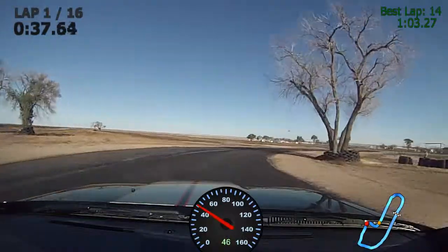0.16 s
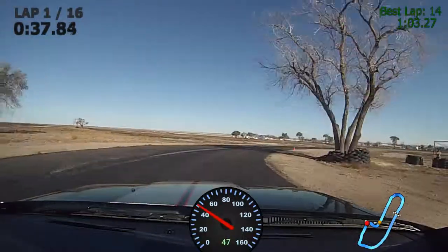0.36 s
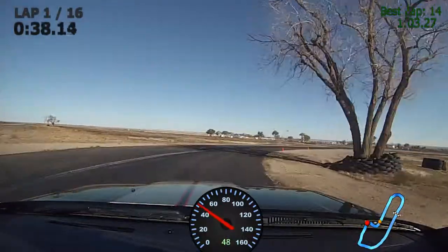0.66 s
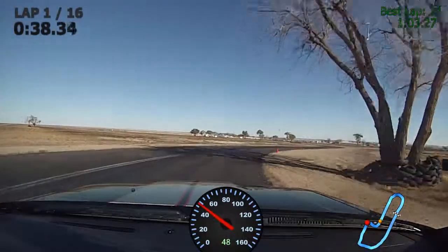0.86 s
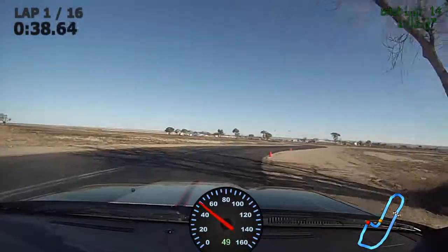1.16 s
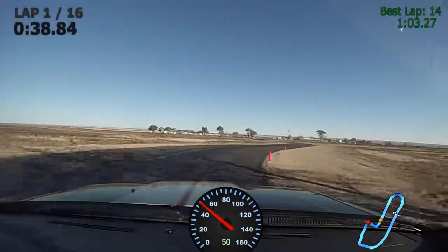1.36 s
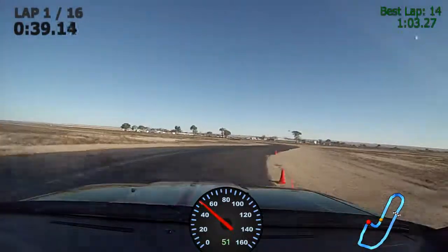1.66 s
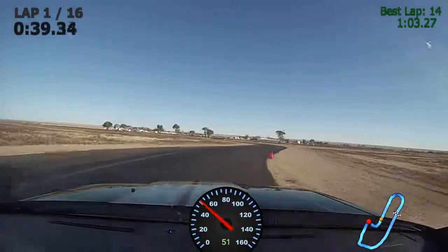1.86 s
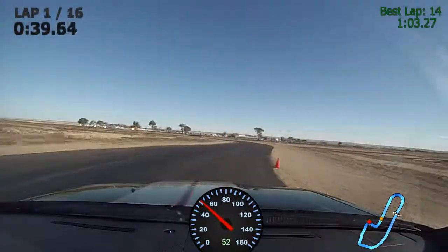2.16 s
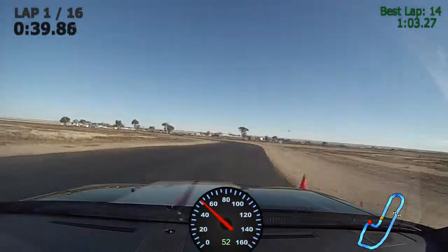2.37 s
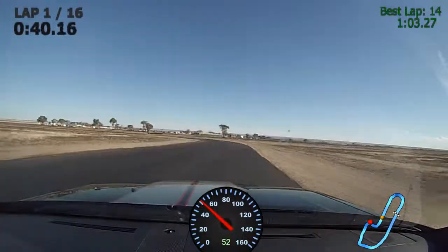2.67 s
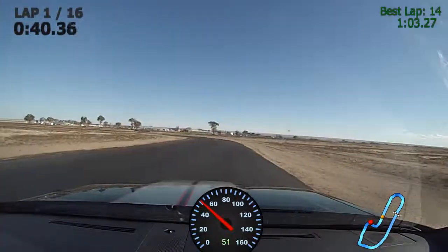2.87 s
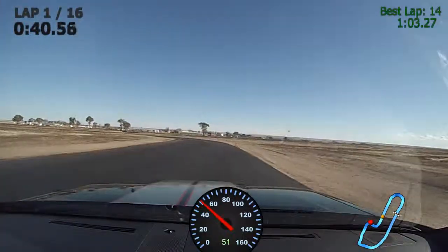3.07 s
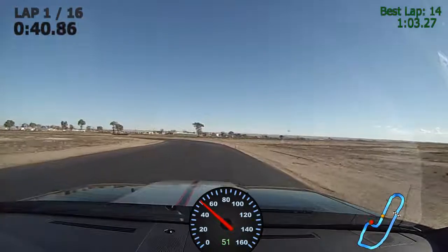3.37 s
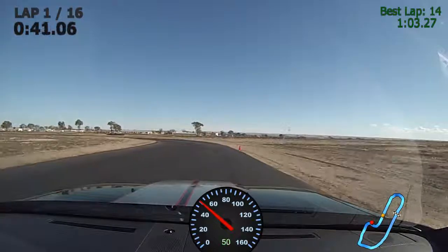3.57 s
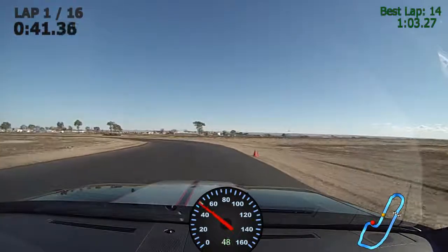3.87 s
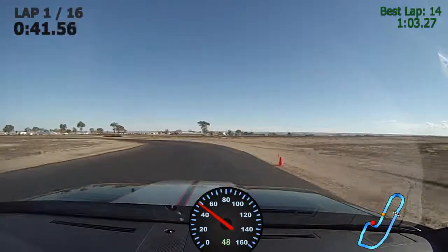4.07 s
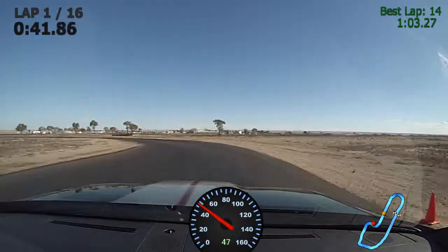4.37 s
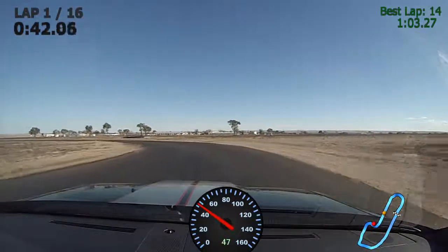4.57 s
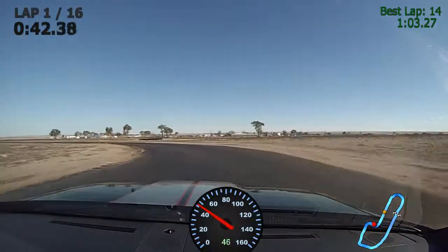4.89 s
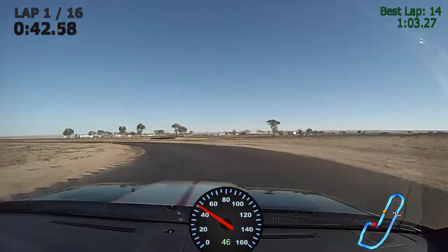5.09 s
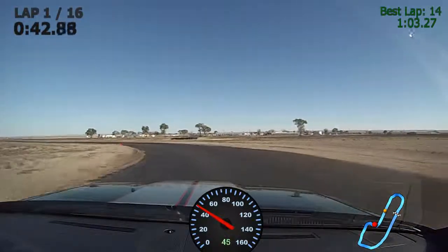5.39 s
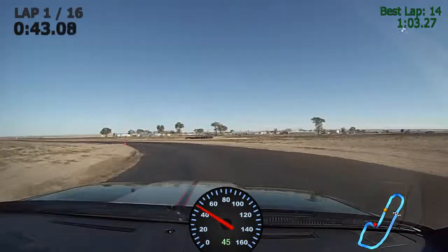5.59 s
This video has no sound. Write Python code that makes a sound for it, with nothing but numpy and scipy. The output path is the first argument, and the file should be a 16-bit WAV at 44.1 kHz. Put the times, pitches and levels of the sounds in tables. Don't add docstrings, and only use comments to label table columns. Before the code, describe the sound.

Close, boomy mono cabin sound, slightly crude and gritty. An eight-cylinder engine pulls in one gear, its pitch creeping upward, over broad road noise. A joint bangs the floor and the level briefly dips; tyres chirp and scrape through the bend. Then the driver lifts, the engine all but vanishes, and wind buffets and hollow floor drumming dominate until a stone clacks on the sill and another joint thuds.

```python
import sys
import numpy as np
from scipy import signal
from scipy.fft import rfft, irfft, next_fast_len
from scipy.io import wavfile
from scipy.ndimage import uniform_filter1d, map_coordinates

SR = 44100
rng = np.random.default_rng(int(sys.argv[2]) if len(sys.argv) > 2 else 0)


def unload_audio(sound):
    columns = np.transpose(np.atleast_2d(sound))
    steps = np.round(np.clip(columns, -1, 1) * 32767)
    wavfile.write(sys.argv[1], SR, steps.astype(np.int16))


def how_loud(loudness_db):
    steps = np.asarray(loudness_db, float) / 20
    return 10 ** steps


N = 253134


def engine():
    # t/s, shaft/(turns/s), load/dB
    drive = [(0, 49.9, 0), (.39, 51.6, 0), (.96, 53.1, 0), (1.3, 54.3, 0), (1.75, 56, -1), (2.33, 57.5, 0),
             (2.6, 58.2, 0), (2.9, 58.6, -2), (3.15, 58.45, -7), (3.35, 58.1, -18), (3.6, 57.4, -26),
             (5.74, 51, -29)]
    orders = [2, 3, 4, 5, 6, 6.5, 7, 7.5, 8, 8.5, 9, 9.5, 10, 10.5, 11, 12, 14]
    # low revs/dB, high revs/dB
    orders_db = [(-35, -30), (-24.5, -22.5), (-21, -25), (-41, -48), (-43, -30), (-46, -38), (-41, -40),
                 (-48, -46), (-45, -50), (-50, -44), (-43, -41), (-45, -40), (-43, -39), (-45, -42),
                 (-44, -46), (-44, -43), (-44, -42)]
    # f/Hz, half width/Hz, lift/dB
    cabin = [(428, 10, 12), (507, 12, 11)]
    breath_db, breath_rate_hz = 0.8, 8

    shaft_hz, load_db = curves(drive)
    angle = 2 * np.pi * np.cumsum(shaft_hz) / SR
    revs = (shaft_hz - 50) / 8.5
    drift = 0.018 * wobble(12)
    tone = np.zeros(N)
    for k, (low_db, high_db) in zip(orders, orders_db):
        level_db = low_db + (high_db - low_db) * revs ** 2 + load_db + 2.5
        for centre_hz, width_hz, lift_db in cabin:
            level_db = level_db + lift_db / (1 + ((k * shaft_hz - centre_hz) / width_hz) ** 2)
        level_db = level_db + breath_db * wobble(breath_rate_hz)
        tone += how_loud(level_db) * np.sin(k * (angle + drift) + rng.uniform(0, 2 * np.pi))
    return tone, angle, revs


def road(angle, revs):
    # t/s, level/dB
    load = [(0, -22), (.26, -23.5), (1.25, -20.5), (1.9, -23.5), (2.36, -21), (3.1, -24), (3.65, -24.5),
            (4.9, -22.5), (5.3, -23.5), (5.74, -25.5)]
    # centre t/s, peak/dB, length/s
    jolts = [(.03, -21, .08), (.13, -19.5, 0.19), (.4, -22, 0.74), (.915, -18, 0.18), (1.45, -19.5, 0.077),
             (1.87, -26.5, 1), (2.55, -22, 0.088), (3.07, -26.5, .08), (3.41, -27.5, 0.17),
             (3.62, -28, 0.15), (3.88, -23, 0.16), (4.47, -24, 0.6), (4.9, -21.5, 0.57),
             (5.23, -25.5, 0.22), (5.616, -18.5, 0.06)]
    # centre t/s, length/s
    lulls = [(1.414, 0.021), (1.55, 0.11), (2.365, 0.077), (3.55, 0.036), (3.68, 0.035), (5.182, 0.036),
             (5.73, 0.084)]
    # f/Hz, level/(dB per Hz)
    boom_colour = [(29, 8.5), (50, -5), (65, -8), (124, -4), (167, -10), (183, -13.5), (200, -6),
                   (232, -21), (280, -18), (360, -46), (620, -120)]
    # f/Hz, level/(dB per Hz)
    roar_colour = [(140, -20), (240, -0.5), (290, -7), (322, 3), (349, -3.5), (442, -2.5), (479, -4.5),
                   (552, 0.5), (690, -3), (796, -0.5), (903, -8), (1030, -8), (1160, -19.5), (1420, -25.5),
                   (1600, -31), (2080, -61), (3520, -120)]
    # f/Hz, level/(dB per Hz)
    hiss_colour = [(900, -38), (1300, 0.5), (1700, -1), (1920, 0.5), (2050, 2.5), (2400, 1), (2800, 0),
                   (2925, 2), (3050, -3), (3600, -7.5), (5000, -12.5), (7500, -18.5), (9500, -24.5),
                   (16000, -34.5)]
    shake_db = -3

    roar_db, = curves(load)
    hiss_db = -49 + 3.5 * np.abs(revs) ** 1.8 + 0.14 * (roar_db - roar_db.mean())
    uneven = wobble(8)
    throb = 1 + 0.044 * np.cos(angle) + 0.13 * np.cos(2 * angle)
    rest = 1 - np.clip(swells([(s, 0, length) for s, length in lulls]), 0, 1)
    shaken = np.hypot(swells(jolts), how_loud(roar_db + shake_db)) * rest

    boom_gain = shaken * how_loud(2.5 + 0.82 * wobble(25)) + how_loud(roar_db - 12.5)
    boom = boom_gain * evened(rush(boom_colour, patchy_db=-0.4), size=3000, share=0.93)
    roar_gain = how_loud(roar_db - 3.5 + 0.31 * uneven + 0.56 * wobble(40)) * throb
    roar = roar_gain * rush(roar_colour, patchy_db=0.1)
    hiss_gain = how_loud(hiss_db + 0.12 * uneven + 1.07 * wobble(60))
    hiss = hiss_gain * rush(hiss_colour, patchy_db=-0.25)
    return boom + roar + hiss


def tyres():
    # t/s, f/Hz, length/s, peak/dB
    slips = [(.005, 1030, .035, -20), (.6, 800, .05, -24), (1.495, 800, .035, -20), (1.535, 1850, .03, -41),
             (1.58, 726, .075, -20), (1.7, 720, .05, -25), (1.745, 725, .075, -19), (1.845, 715, .025, -22),
             (1.865, 720, .04, -19), (1.9, 725, .045, -16), (1.94, 725, .045, -18), (1.985, 725, .04, -15),
             (2.04, 735, .035, -19), (2.08, 735, .028, -16), (2.14, 790, .03, -19), (2.175, 800, .03, -20),
             (2.21, 800, .045, -22), (2.305, 722, .05, -15), (2.372, 833, .07, -15), (2.44, 800, .05, -23),
             (2.497, 830, .026, -14), (2.525, 845, .03, -21), (2.635, 800, .028, -24),
             (2.74, 780, .06, -25), (5.03, 780, .045, -24), (5.085, 780, .04, -24), (5.335, 782, .1, -20),
             (5.47, 790, .09, -25)]
    # t/s, f/Hz, peak/dB
    plucks = [(.059, 700, -18), (1.21, 740, -16), (3.471, 820, -15), (3.922, 620, -19), (3.99, 700, -22),
              (4.09, 700, -21), (4.146, 700, -23)]
    # t/s, f/Hz, length/s, peak/dB
    drums = [(3.3, 119, 0.1, -16.5), (3.56, 117.7, 0.21, -22), (4.21, 159.7, 0.4, -15.5),
             (4.25, 81.2, 0.23, -20.5), (4.39, 117, 0.15, -18), (4.61, 121.4, 0.17, -16),
             (4.84, 117.6, .16, -18.5), (4.88, 193, 0.069, -16), (5.06, 206.7, 0.13, -20.5),
             (5.18, 117.1, 0.4, -20.5)]
    # centre t/s, peak/dB, length/s
    scrubs = [
        (2.25, -50, 0.18),
        (2.43, -41.5, 0.17),
        (2.56, -44.5, 0.16),
        (2.67, -51.5, 0.19),
    ]
    # f/Hz, level/(dB per Hz)
    scrub_colour = [(1400, -34), (1650, -1), (1900, 2.5), (2200, -6), (2600, -10.5), (2950, -8),
                    (3300, -14), (4500, -40)]
    pluck_s = 0.011

    scrub = swells(scrubs) * how_loud(2 * wobble(90)) * rush(scrub_colour, patchy_db=1)
    snaps = [(s, hz, pluck_s, db) for s, hz, db in plucks]
    squeal = bursts(slips + snaps, waver=0.009)
    return squeal + bursts(drums, waver=0.019) + scrub


def bumps():
    # t/s, cabin air/dB, floor pan f/Hz, floor pan/dB, floor pan t60/s
    joints = [
        (1.284, 2, 156, 1, 0.069),
        (5.442, 1, 149.3, -3, 0.22),
    ]
    out, t = np.zeros(N), np.arange(SR // 4) / SR
    for s, air_db, pan_hz, pan_db, pan_t60_s in joints:
        air = -ring(t, 48, air_db, 0.3) * (1 - np.exp(-t / 0.005))
        pan = ring(t, pan_hz, pan_db, pan_t60_s) + ring(t, 1.78 * pan_hz, pan_db - 21, 0.19)
        add(out, s + 0.002, air)
        add(out, s, pan)
    return out


def stones():
    # t/s, peak/dB, centre f/Hz, t60/s
    grit = [(1.283, -28, 2700, 0.092), (1.3, -39, 2940, 0.092), (1.535, -36, 1850, 0.17),
            (1.67, -35, 6800, 0.055), (1.717, -33, 3100, .06), (5.2605, -37, 3500, 0.027),
            (5.263, -12.5, 2720, 0.061), (5.282, -43, 3000, 0.043), (5.428, -46, 6500, 0.0092),
            (5.442, -34, 2980, 0.045), (5.455, -36, 3500, 0.17), (5.47, -37, 4000, 0.054)]
    # multiple of centre f, level/(dB per Hz)
    splash = [(.45, -30), (.8, -3), (1, 0), (1.3, -5), (2.2, -10), (5, -24)]
    # t/s, level/dB
    knocks = [
        (5.2613, -7.5),
        (5.2668, -9.5),
        (5.2835, -22.5),
    ]
    # f/Hz, level/dB, t60/s
    sill = [(348, -2.5, 0.03), (584, 1, 0.019), (870, -42, .012), (2850, -18, 0.033), (3340, -21, 0.04)]
    out, t = np.zeros(N), np.arange(SR // 8) / SR
    for s, db, centre_hz, t60_s in grit:
        colour = [(k * centre_hz, level_db) for k, level_db in splash]
        spray = coloured(rng.standard_normal(len(t)), colour)
        add(out, s, how_loud(db - 11 - 60 * t / t60_s) * (1 - np.exp(-t / 0.0011)) * spray)
    for s, db in knocks:
        add(out, s, sum(ring(t, hz, db + level_db - 2, t60_s) for hz, level_db, t60_s in sill))
    return out


def buffet():
    # centre t/s, peak/dB, length/s
    gusts = [(.13, -19, 0.11), (.42, -17.5, 0.86), (.67, -23, 0.17), (.88, -20, 0.27), (1.06, -15, .1),
             (1.22, -23, .25), (1.7, -19.5, 0.37), (2.14, -14.5, 0.57), (2.48, -12.5, 0.15),
             (2.82, -15.5, 0.98), (3.18, -11.5, 0.15), (3.31, -20, 0.072), (3.44, -16.5, 0.14),
             (3.58, -14, 0.17), (3.705, -19, 0.033), (3.785, -10, 0.081), (4.04, -17, 0.43),
             (4.15, -10.5, 0.071), (4.27, -13.5, 0.094), (4.41, -14, 0.11), (4.62, -12.5, 0.26),
             (4.79, -14.5, .11), (4.93, -13, 0.078), (5.05, -10.5, 0.11), (5.24, -17, 0.48),
             (5.67, -15.5, 0.21)]
    # f/Hz, level/(dB per Hz)
    air_colour = [(7.1, -49), (18, 1), (30, 10.5), (46, -1.5), (65, -9.5), (70, -9), (91, -69), (150, -120)]
    calm_db = -29
    air = evened(coloured(rng.standard_normal(N), air_colour), size=2500, share=0.53)
    return np.hypot(swells(gusts), how_loud(calm_db)) * air


def bursts(rows, waver):
    out, shake = np.zeros(N), wobble(90)
    for s, hz, length_s, db in rows:
        u = np.arange(round(length_s * SR)) / SR
        pitch_hz = hz * (1 + waver * shake[round(s * SR):][:len(u)])
        phase = 2 * np.pi * np.cumsum(pitch_hz) / SR
        swell = np.sin(np.pi * (u / length_s) ** 0.8) ** 0.6
        add(out, s, how_loud(db - 2.5) * swell * (np.sin(phase) + how_loud(-41) * np.sin(2 * phase)))
    return out


def swells(rows):
    power = np.zeros(N + SR)
    for s, db, length_s in rows:
        add(power, s + 1 - length_s / 2, how_loud(2 * db) * np.hanning(round(length_s * SR)))
    return np.sqrt(power[SR:])


def rush(points, patchy_db):
    z = signal.stft(rng.standard_normal(N), nperseg=512)[2]
    field = uniform_filter1d(rng.standard_normal(z.shape), size=4, axis=0)
    field = uniform_filter1d(field, size=10, axis=1)
    patchy = signal.istft(z * how_loud(patchy_db * unit(field)), nperseg=512)[1][:N]
    return coloured(patchy, points)


def coloured(x, points):
    m = next_fast_len(len(x) + 8192)
    f, db = np.transpose(points)
    log_f = np.log(np.fft.rfftfreq(m, 1 / SR) + 1)
    gain = how_loud(np.interp(log_f, np.log(f + 1), db, -120, -120))
    return unit(irfft(rfft(x, m) * gain, m)[:len(x)])


def evened(x, size, share):
    power = np.abs(uniform_filter1d(x ** 2, size))
    return unit(x / (power + 0.039) ** (share / 2))


def ring(t, hz, db, t60_s):
    return how_loud(db - 60 * t / t60_s) * np.sin(2 * np.pi * hz * t)


def wobble(rate_hz):
    knots = rng.standard_normal(int(N * 200 / SR) + 4)
    return map_coordinates(knots, [np.arange(N) * min(rate_hz, 200) / SR])


def curves(rows):
    s, *cols = np.transpose(rows)
    return [np.interp(np.arange(N) / SR, s, c) for c in cols]


def unit(x):
    return x / np.sqrt(np.mean(x ** 2) + 1e-20)


def add(out, s, x):
    part = out[round(s * SR):][:len(x)]
    part += x[:len(part)]


def scene():
    tone, angle, revs = engine()
    mix = tone + road(angle, revs) + buffet() + tyres() + bumps() + stones()
    return mix[None]


def low_pass(x):
    return signal.sosfilt(signal.butter(12, 15710, fs=SR, output="sos"), x)


def record(dry):
    # t/s, depth/dB, recovery/s
    ducks = [
        (1.288, -7, 0.35),
        (5.452, -8.5, 0.25),
    ]
    camera_rate_hz = 48000
    t = np.arange(N) / SR
    gain_db = np.zeros(N)
    for s, depth_db, recovery_s in ducks:
        since = np.clip(t - s, 0, None)
        gain_db += depth_db * (1 - np.exp(-since / 0.029)) * np.exp(-(since / recovery_s) ** 2)
    x = dry * how_loud(gain_db)
    x = x / (1 + np.abs(x / 0.98) ** 14) ** (1 / 14)
    exact = np.arange(N) * camera_rate_hz / SR
    picked = exact + 1.015 * (np.round(exact) - exact)
    x = map_coordinates(x[0], [picked * SR / camera_rate_hz], order=3, mode="nearest")[None]
    return low_pass(x)


dry = scene()
out = record(dry)
unload_audio(out)
```